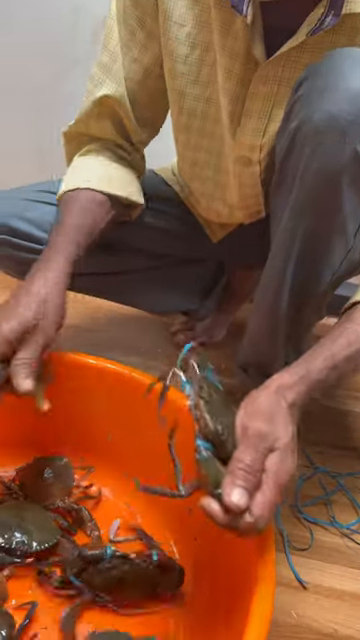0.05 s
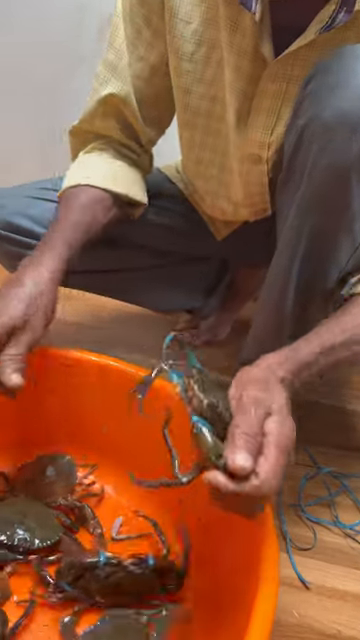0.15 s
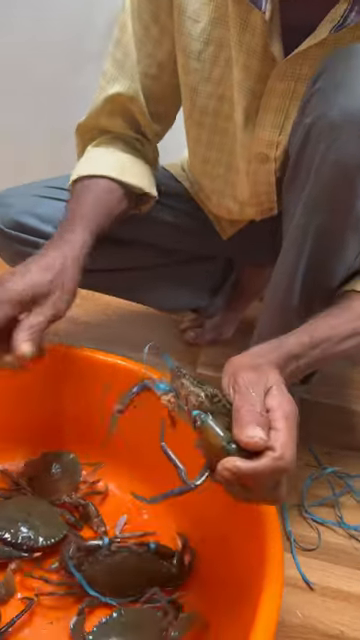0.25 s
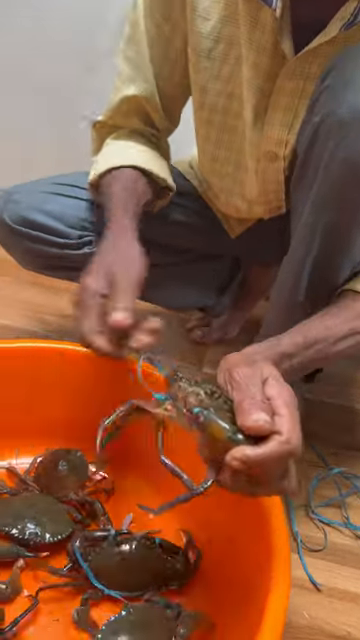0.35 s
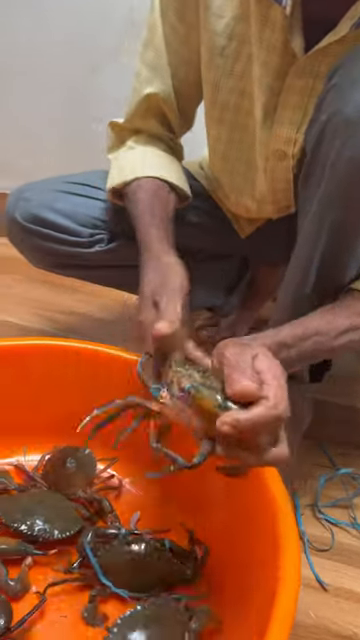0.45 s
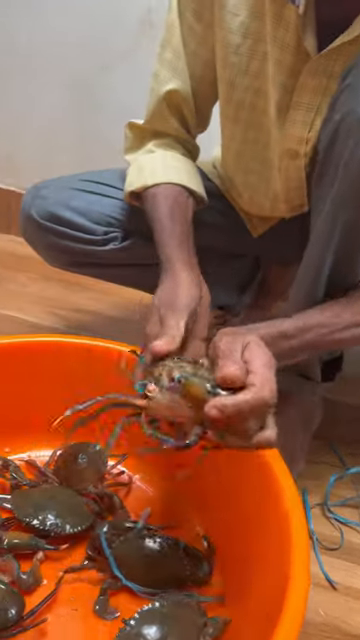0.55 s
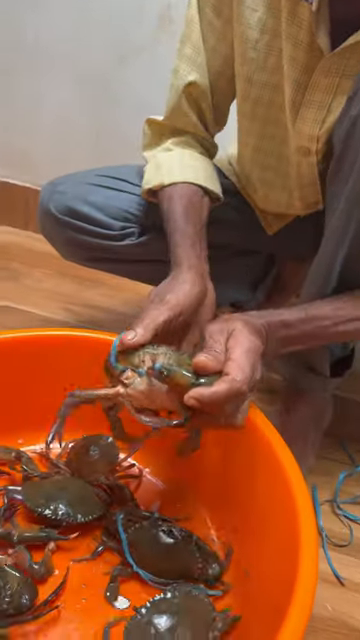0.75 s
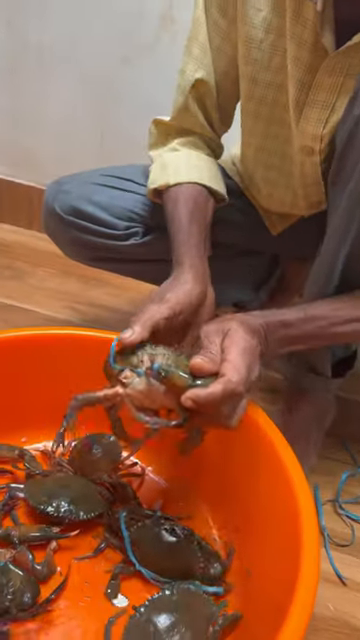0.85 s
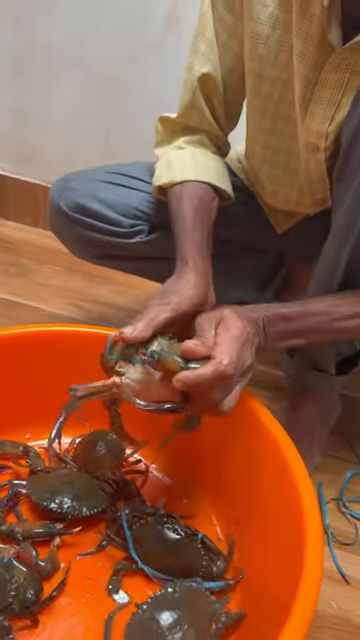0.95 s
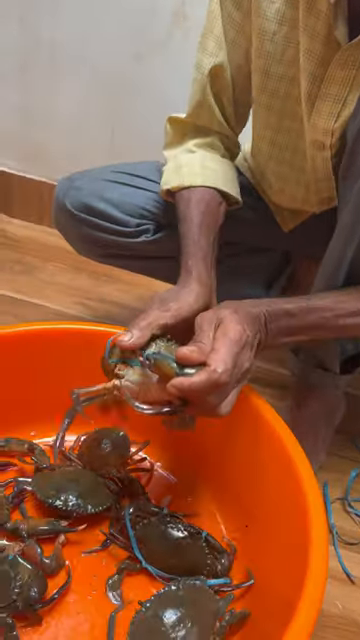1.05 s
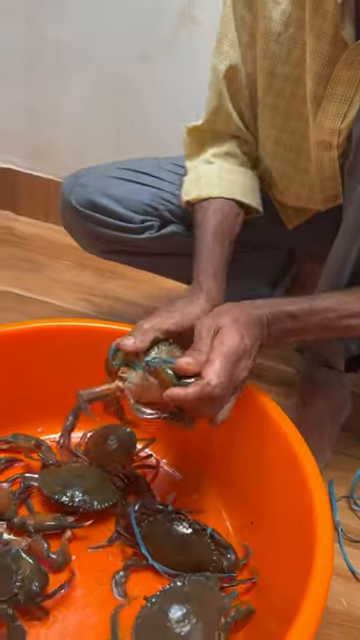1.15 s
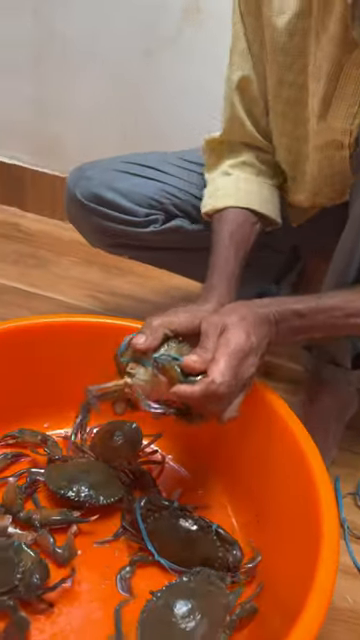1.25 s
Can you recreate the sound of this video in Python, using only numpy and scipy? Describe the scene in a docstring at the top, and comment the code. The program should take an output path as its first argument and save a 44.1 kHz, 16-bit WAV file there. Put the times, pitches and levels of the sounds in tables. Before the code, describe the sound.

Hard crab shells knock rapidly on a plastic tub, making it ring briefly, then ease into ticking, scratching and a few soft taps. The sound is close, in a small echoing room with faint rumble and steady high hiss.

```python
"""Crabs in a plastic tub

Live crabs are handled over a plastic tub in a small room with hard walls. Legs scrabble, then shells
clatter against the tub in a quick run of knocks that set its wall and bottom ringing, with two tiny
squeaks. Claw tips tick and scratch, and a dull scrape and a few soft knocks follow. Behind it all
are a low rumble of handling, quiet room noise and a thin, steady high hiss."""
import sys
import numpy as np
from scipy import signal
from scipy.fft import rfft, irfft
from scipy.io import wavfile
from scipy.ndimage import uniform_filter1d

SR = 44100
rng = np.random.default_rng(int(sys.argv[2]) if len(sys.argv) > 2 else 0)


def transcribe(signal):
    """Save signal, clipped to [-1, 1], as a 16-bit WAV file at the path in sys.argv[1]."""
    frames = np.atleast_2d(signal).T
    limited = np.clip(frames, -1, 1)
    pcm = np.round(limited * 32767).astype(np.int16)
    wavfile.write(sys.argv[1], SR, pcm)


N = 57330
T = np.arange(N) / SR


def from_db(db):
    """Turn decibels into a number to multiply by."""
    return 10 ** (np.asarray(db) / 20)


def unit_power(x):
    """Scale a sound so that its average power is 1."""
    return x / np.sqrt(np.mean(x ** 2) + 1e-20)


def loudness(points):
    """Join (time_s, level_db) points into a gain for every sample."""
    return from_db(np.interp(T, *np.transpose(points)))


def on_grid(hz, values):
    """Read a curve at every frequency of the FFT."""
    grid_hz = np.arange(N + 1) * SR / (2 * N)
    return np.interp(np.log(grid_hz + 1), np.log(hz), values)


def colour(x, tone):
    """Filter a sound to follow (frequency_hz, level_db) points."""
    gains = from_db(on_grid(*np.transpose(tone)))
    cepstrum = irfft(np.log(gains))[:N]
    cepstrum[1:] *= 2   # minimum phase: nothing sounds before its cause
    return irfft(rfft(x, 2 * N) * np.exp(rfft(cepstrum, 2 * N)))[..., :N]


def clicks(times_s, heights):
    """Clicks that are each one sample long."""
    out = np.zeros(N)
    samples = (np.asarray(times_s) * SR).astype(int)
    np.add.at(out, np.clip(samples, 0, N - 1), heights)
    return out


def ring(x, hz, fade_s, thin_bass=False):
    """Each click starts a tone that fades by 60 dB in fade_s; thin_bass weakens what lies below it."""
    decay, step = from_db(-60 / (fade_s * SR)), 2 * np.pi * hz / SR
    feed = [.5, 0, -.5] if thin_bass else [0, np.sin(step)]
    return signal.lfilter(feed, [1, -2 * decay * np.cos(step), decay ** 2], x + 1e-18)


def fading_noise(fade_s):
    """Noise that fades by 60 dB in fade_s."""
    return rng.standard_normal(N) * from_db(-60 * np.minimum(T / fade_s, 10))


def friction(levels, tone, slips_per_s):
    """Shell catches and slips on plastic, making many tiny clicks at random moments."""
    slips = rng.choice([-1, 1], N) * (rng.random(N) < slips_per_s / SR)
    return unit_power(colour(slips, tone)) * loudness(levels)


def stereo(mid, side, width):
    """Left and right share the mid sound; the filtered side sound makes them differ."""
    hz, db, lag_degrees = np.transpose(width)
    response = from_db(on_grid(hz, db)) * np.exp(-1j * np.radians(on_grid(hz, lag_degrees)))
    side = irfft(rfft(side, 2 * N) * response)[:N]
    return np.array([mid + side, mid - side])


# Tone of the room noise: frequency_hz, level_db
NOISE_TONE = [(20, -38), (55, -5), (100, -4.5), (155, 6), (280, -4), (500, -8), (850, -6), (1500, -10.5),
              (2200, -9), (3300, -15.5), (5000, -17.5), (6800, -18), (12000, -21.5), (15500, -23.5)]
# How its left and right differ: frequency_hz, side_db, lag_degrees
NOISE_WIDTH = [(100, -18, 60), (724, -2, 81), (1670, -23, 60), (2400, -4.5, 80), (8000, -0.5, 90),
               (12000, -1.5, 90)]


def room_noise():
    """Quiet, steady noise, strongest in the bass."""
    mid, side = unit_power(colour(rng.standard_normal((2, N)), NOISE_TONE))
    return from_db(-52) * stereo(mid, side, NOISE_WIDTH)


# Bands of hiss: centre_hz, width_hz, level_db, left_right_likeness (0 to 1)
HISS_BANDS = [(9734, 780, -45, 0.14), (2466, 140, -57, 0), (12350, 520, -70, 0)]


def hiss():
    """Narrow bands of noise make a thin, steady hiss."""
    out = np.zeros((2, N))
    for hz, width_hz, db, alike in HISS_BANDS:
        band = signal.butter(1, [hz - width_hz / 2, hz + width_hz / 2], "band", fs=SR, output="sos")
        noise = signal.sosfilt(band, rng.standard_normal((2, N)))
        mid, side = unit_power(signal.sosfilt(band, noise))   # a second pass steepens the edges
        mid, side = np.sqrt((1 + alike) / 2) * mid, np.sqrt((1 - alike) / 2) * side
        out += from_db(db) * np.array([mid + side, mid - side])
    return out


# How loud the handling rumbles: time_s, level_db
RUMBLE_LEVELS = [(0, -36), (.05, -54), (.13, -59), (.18, -45), (.24, -53), (.5, -66), (.57, -52),
                 (.64, -75), (.8, -64), (1.05, -67), (1.2, -57), (1.3, -59)]
# Tone of the rumble: frequency_hz, level_db
RUMBLE_TONE = [(25, -28), (52, -4), (90, 6), (160, -10.5), (400, -50)]


def rumble():
    """A dull rumble swells and sinks with the handling."""
    return unit_power(colour(rng.standard_normal(N), RUMBLE_TONE)) * loudness(RUMBLE_LEVELS)


# How hard the legs scrabble: time_s, level_db
LEG_LEVELS = [(0, -33), (.03, -39.5), (.062, -43.5), (.1, -42), (.16, -47.5), (.21, -45), (.24, -29.5),
              (.32, -30.5), (.37, -37.5), (.46, -34), (.51, -47), (.6, -52.5), (1.3, -88)]
# Tone of the legs: frequency_hz, level_db
LEG_TONE = [(80, -7), (400, -3), (800, 4.5), (1500, -1), (2700, -2), (3800, -8.5), (8000, -21.5),
            (15000, -32)]


def scrabbling_legs():
    """Legs skid over the plastic in a fine crackle."""
    return friction(LEG_LEVELS, LEG_TONE, slips_per_s=810)


# Soft thumps as weight presses on the tub: start_s, level_db, pitch_hz
BUMPS = [(.001, -36, 98.2), (.122, -32, 114), (.158, -31.5, 87), (.286, -13.5, 114), (.436, -22, 136),
         (0.742, -43, 140), (.896, -31, 170), (.918, -35, 101), (1.133, -38.5, 151), (1.2, -50, 105)]


def bumps():
    """A soft push bends the tub, which swings back and quickly settles."""
    swings = sum(ring(clicks([s], from_db(db)), hz, fade_s=0.087, thin_bass=True) for s, db, hz in BUMPS)
    return signal.sosfilt(signal.butter(2, [65, 500], "band", fs=SR, output="sos"), swings)


# Tone of a shell's sharp crack: frequency_hz, level_db
CRACK_TONE = [(300, -14), (1500, 4), (2600, 6.5), (3600, -6), (7000, -5.5), (9500, -12.5), (12000, -6),
              (13300, -18), (15500, -11.5)]


def cracks(times_s, levels_db, brightness_db):
    """Hard shell meets a surface: a snap and a moment of grit, brighter for a sharper point."""
    out = np.zeros(N)
    treble = signal.butter(1, 8400, "high", fs=SR)
    for s, db, bright_db in zip(times_s, levels_db, brightness_db):
        burst = fading_noise(fade_s=0.014)
        burst[0] = 1.53   # the snap
        burst += (from_db(bright_db) - 1) * signal.lfilter(*treble, burst)
        start = int(s * SR)
        out[start:] += from_db(db) * burst[:N - start]
    return colour(out, CRACK_TONE)


def tub(times_s, blows_db, tones, uneven_db, dull_above_hz):
    """Blows ring part of the tub, each tone by a random amount; the contact gives, dulling the sound."""
    luck_db = uneven_db * rng.standard_normal((len(times_s), len(tones)))
    out = np.zeros(N)
    for k, (hz, db, fade_s) in enumerate(tones):
        blows = clicks(times_s, from_db(blows_db + db + luck_db[:, k]))
        out += (-1) ** k * ring(blows, hz, fade_s, thin_bass=True)   # neighbours swing opposite ways
    return signal.sosfilt(signal.butter(2, dull_above_hz, fs=SR, output="sos"), out)


def shell_clack(start_s, db, hz, fade_s, overtone_ratio=1.7):
    """A hollow shell rings briefly, with a weaker overtone that dies sooner."""
    blow = clicks([start_s], from_db(db))
    overtone = ring(blow, hz * overtone_ratio, fade_s / overtone_ratio)
    return ring(blow, hz, fade_s) - from_db(-9.5) * overtone


# Shells hitting the tub:
# start_s, shell_db, shell_pitch_hz, shell_fade_s, crack_db, brightness_db, wall_db, bottom_db
KNOCKS = [(.006, -34, 876, 0.049, -45, 8, -39, -52), (.024, -41, 1500, .016, -31, -10, -39.5, -46),
          (0.0707, -27, 875, .014, -24.5, -20, -45, -63), (.1105, -49, 1430, 0.02, -20, -20, -38, -47),
          (0.1836, -33, 1800, 0.034, -17.5, -23, -48, -56), (.192, -22, 930, 0.01, -21, -19, -64, -56),
          (0.2201, -42, 1290, 0.013, -10.5, 0.5, -28.5, -56),
          (.228, -14, 1188, 0.025, -24.5, 10.5, -30.5, -32.5),
          (.232, -18, 2050, 0.023, -25, 10, -18, -33.5), (.236, -8.5, 1150, 0.0061, -10.5, 9, -26.5, -48),
          (.238, -19, 1180, 0.024, -16, 6, -27.5, -31.5), (0.2439, -14, 1380, 0.022, -15.5, -11, -36, -40),
          (.257, -22, 1010, 0.006, -30, -9, -43, -58), (0.2674, -19.5, 1910, .02, -30, -10, -42, -46),
          (0.2765, -11.5, 1345, 0.016, -30, -7, -27, -28), (0.2827, -7, 726, 0.021, -8.5, 3, -18.5, -27.5),
          (0.2839, -11, 1650, 0.017, -14, -12, -25.5, -42),
          (.288, -13.5, 750, 0.023, -12.5, -11, -26.5, -25), (0.303, -8, 990, 0.011, -16, -15, -29, -28.5),
          (0.3167, -10.5, 1670, 0.0078, -18.5, -15, -25.5, -45),
          (.333, -22, 1080, .016, -33, -10, -31, -24.5), (.365, -28, 890, 0.019, -31, -10, -34.5, -56),
          (.375, -21, 960, .016, -26, -10, -34, -34), (0.3929, -8.5, 1080, 0.0094, -20.5, -13, -29, -41),
          (0.3982, -17, 1260, 0.025, -13.5, -18, -34.5, -40), (.415, -18, 1410, 0.012, -30, -6, -43, -32),
          (0.4272, -12, 968, 0.033, -17, 5.5, -30.5, -30),
          (.441, -7.5, 1060, 0.0075, -16, -0.5, -27, -23.5), (0.4433, -24, 1530, 0.013, -25, -9, -32, -36),
          (0.7194, -32, 810, 0.04, -54, -8, -53, -67), (0.794, -38, 1644, 0.038, -43, -10, -62, -63),
          (.819, -20.5, 910, .012, -31, -4, -42, -54), (.892, -22, 890, 0.014, -45, -7, -39.5, -42),
          (.903, -25, 755, 0.015, -53, -10, -50.5, -42), (1.127, -38.5, 860, 0.021, -45, -18, -56, -52),
          (1.287, -40.5, 1960, .03, -45, -8, -65, -58)]
# Ringing tones of the tub's wall: pitch_hz, level_db, fade_s
WALL_TONES = [(391.7, -18, 0.61), (627, -9, .09), (658.3, -8.5, 0.092), (707, -6.5, 0.14), (849, -6.5, .14),
              (892, -10, 0.22), (949.5, -9, .11), (1044, -9.5, 0.12), (1231, -4.5, 0.11), (1314, -18, .09),
              (1521, -8.5, 0.09), (1662, -13, .11), (2030, -11, 0.085), (2305, -11, 0.084),
              (2787, -11.5, .1)]
# Ringing tones of the tub's bottom: pitch_hz, level_db, fade_s
BOTTOM_TONES = [(100, -9, 0.19), (113, -6.5, 0.089), (155.5, -5.5, 0.21), (198, -5, 0.11), (255, -5, 0.068),
                (321.3, -4, 0.17), (422, -6, 0.025)]


def knocks():
    """Each knock makes a sharp crack, rings the shell, and shakes the tub's wall and bottom."""
    start_s, *_, crack_db, brightness_db, wall_db, bottom_db = np.transpose(KNOCKS)
    shells = sum(shell_clack(s, db, hz, fade_s) for s, db, hz, fade_s, *_ in KNOCKS)
    snaps = cracks(start_s, crack_db, brightness_db)
    wall = tub(start_s, wall_db, WALL_TONES, uneven_db=4.5, dull_above_hz=3560)
    bottom = tub(start_s, bottom_db, BOTTOM_TONES, uneven_db=2.95, dull_above_hz=700)
    return shells + snaps + wall + bottom


# Light taps of claw tips: start_s, level_db, brightness_db
CLAW_TICKS = [(0.083, -27, 6), (0.149, -35, -5), (.611, -49, 16), (0.649, -37.5, 8), (0.673, -35, 10),
              (0.879, -43.5, 14), (1.014, -41.5, 9), (1.086, -33, -9)]


def claw_ticks():
    """A claw tip makes a small crack with no ringing."""
    return cracks(*np.transpose(CLAW_TICKS))


# Tiny squeaks of shell on plastic: loudest_at_s, level_db, pitch_hz
SQUEAKS = [(.309, -30.5, 2727), (0.446, -21.5, 2788)]


def squeaks(rise_s=.006, fall_s=.007, waver_hz=25):
    """Shell sticks and slips, making a wavering tone that quickly swells and dies."""
    out = np.zeros(N)
    for peak_s, db, hz in SQUEAKS:
        waver = unit_power(uniform_filter1d(rng.standard_normal(N), size=200))
        phase = 2 * np.pi * np.cumsum(hz + waver_hz * waver) / SR
        from_peak = np.where(T < peak_s, (peak_s - T) / rise_s, (T - peak_s) / fall_s)
        swell = np.exp(-np.minimum(from_peak, 20))
        out += from_db(db) * swell * np.sin(phase)
    return out


# How hard the claw tips scratch: time_s, level_db
SCRATCH_LEVELS = [(.59, -80), (.63, -66), (.655, -47), (.69, -56), (.73, -75), (.86, -66), (.98, -75),
                  (1.02, -51), (1.06, -71)]
# Tone of the scratching: frequency_hz, level_db
SCRATCH_TONE = [(2000, -23), (6000, -1), (10000, -1), (12000, -4), (15500, -0.5)]


def claw_scratches():
    """Claw tips slide on the plastic with a thin, high scratch."""
    return friction(SCRATCH_LEVELS, SCRATCH_TONE, slips_per_s=1200)


# How hard a shell is dragged: time_s, level_db
SCRAPE_LEVELS = [(.66, -60.5), (.71, -46.5), (.75, -41), (.78, -40.5), (.81, -37), (.84, -53), (.88, -51.5),
                 (.95, -62)]
# Tone of the scrape: frequency_hz, level_db
SCRAPE_TONE = [(80, -12), (250, -1), (500, -1), (850, 6.5), (1250, 0), (1700, -7), (2300, -17.5),
               (3500, -25), (12000, -47)]


def shell_scrape():
    """A shell drags over the plastic with a dull scrape."""
    return friction(SCRAPE_LEVELS, SCRAPE_TONE, slips_per_s=1200)


# Tone of the room's echo: frequency_hz, level_db
ECHO_TONE = [(60, -25.5), (150, -3), (260, -1.5), (400, 3.5), (900, -5.5), (2500, -2.5), (5000, -1.5),
             (9000, 0), (15000, -27)]


def room_echo(x, fade_s=0.44, delay_s=0.0029):
    """Sound bounces between the hard walls and blurs into a short tail."""
    tail = colour(fading_noise(fade_s) * (T > delay_s), ECHO_TONE)
    noise_energy = fade_s * SR / (2 * np.log(1000))
    tail *= from_db(-7) / np.sqrt(noise_energy)
    return signal.fftconvolve(x, tail)[:N]


# How the crabs differ left and right, least in the bass: frequency_hz, side_db, lag_degrees
CRAB_WIDTH = [(100, -28, 30), (350, -18, 25), (706, -9, 40), (1000, -16.5, 70), (1530, -30, 130),
              (1960, -16.5, 190), (2280, -2, 270), (3770, -5, 260), (5300, -2, 464), (8000, -5, 440),
              (12000, -0.5, 453)]


def scene():
    """Crabs and tub up close, with the room's echo and the background sounds."""
    crabs = knocks() + claw_ticks() + bumps() + squeaks()
    crabs += scrabbling_legs() + shell_scrape() + claw_scratches()
    mid, side = crabs + room_echo(crabs), crabs + room_echo(crabs)   # each gets its own random echo
    return stereo(mid, side, CRAB_WIDTH) + rumble() + room_noise() + hiss()


def record(dry):
    """Take away the deepest bass and the highest treble."""
    dry = signal.sosfilt(signal.butter(2, 45, "high", fs=SR, output="sos"), dry)
    return signal.sosfilt(signal.cheby2(12, 70, 17000, fs=SR, output="sos"), dry)


dry = scene()
out = record(dry)
transcribe(out)
```